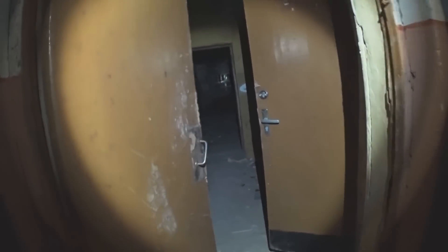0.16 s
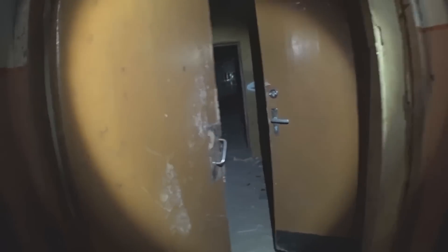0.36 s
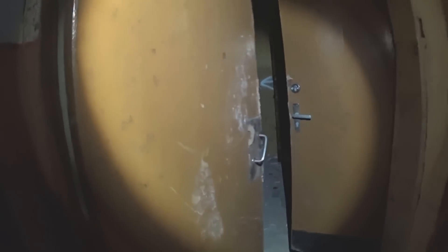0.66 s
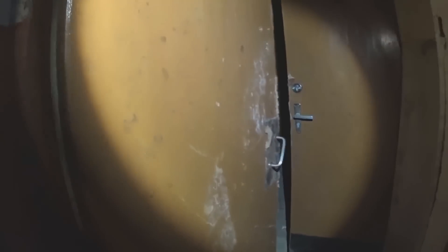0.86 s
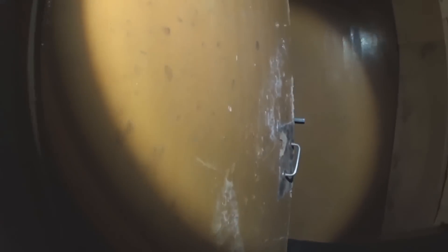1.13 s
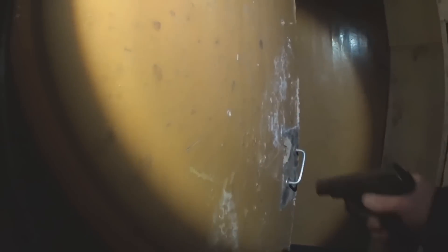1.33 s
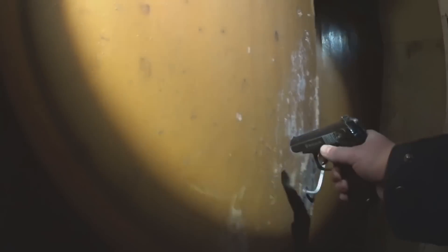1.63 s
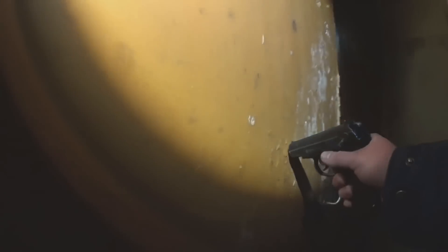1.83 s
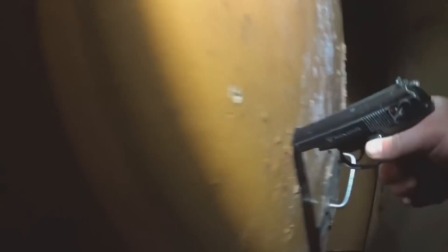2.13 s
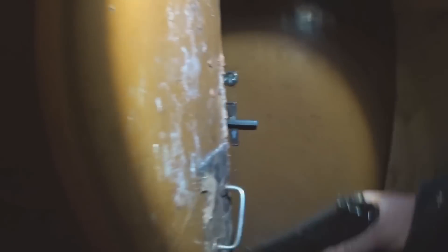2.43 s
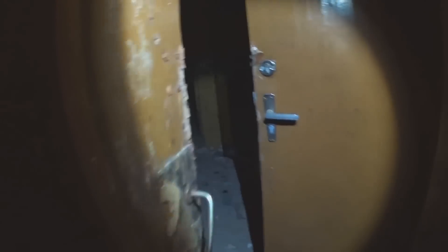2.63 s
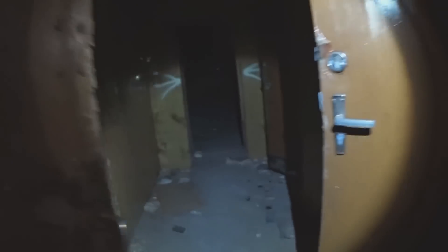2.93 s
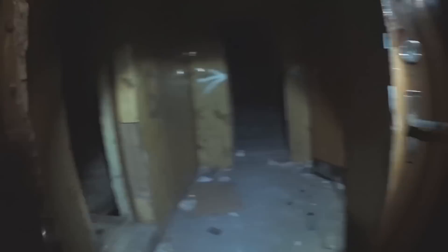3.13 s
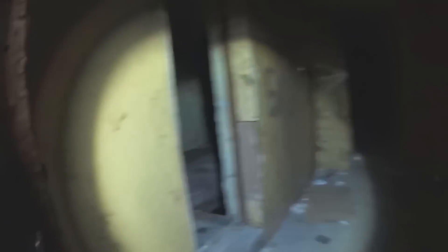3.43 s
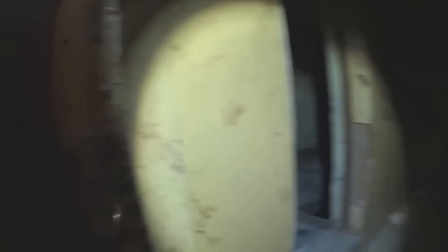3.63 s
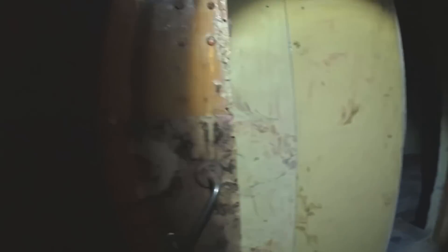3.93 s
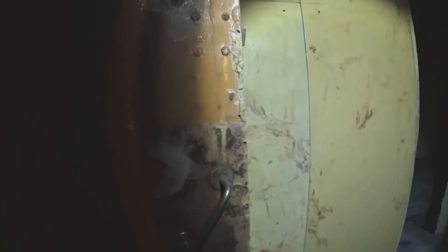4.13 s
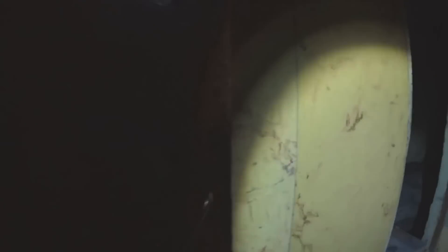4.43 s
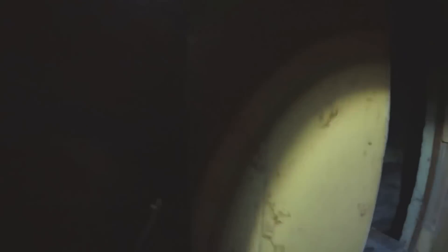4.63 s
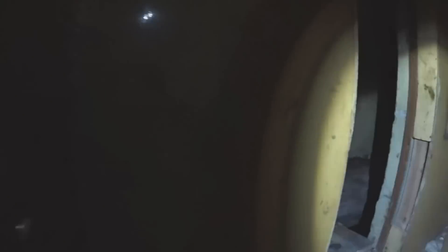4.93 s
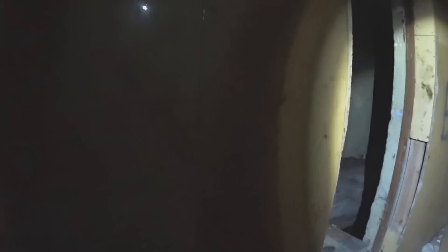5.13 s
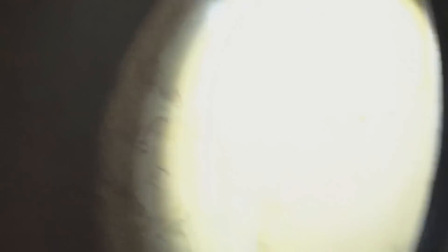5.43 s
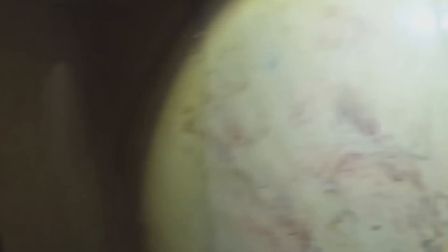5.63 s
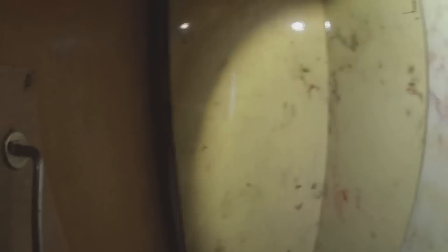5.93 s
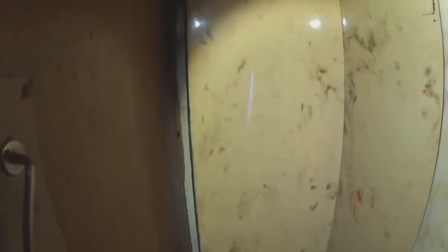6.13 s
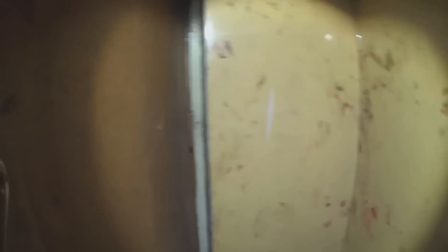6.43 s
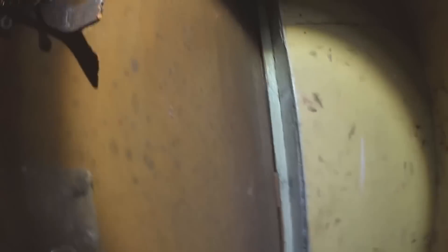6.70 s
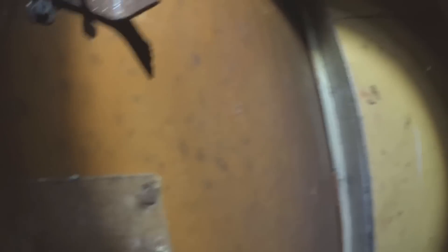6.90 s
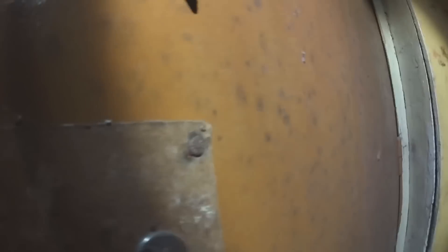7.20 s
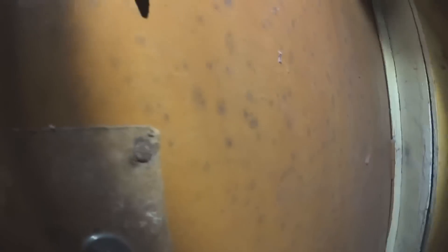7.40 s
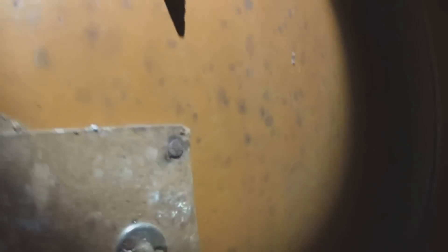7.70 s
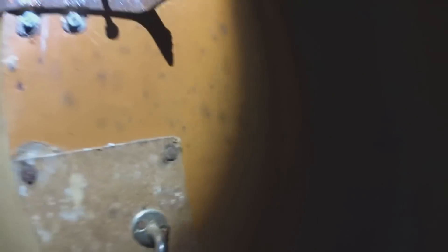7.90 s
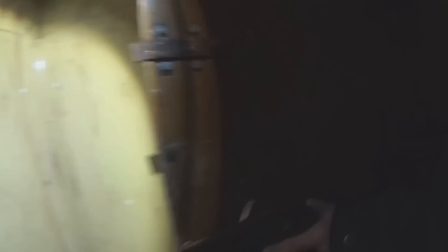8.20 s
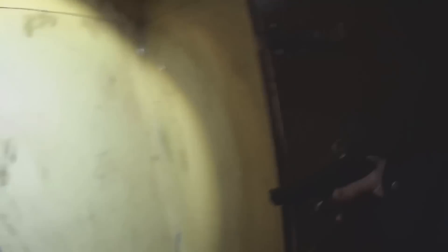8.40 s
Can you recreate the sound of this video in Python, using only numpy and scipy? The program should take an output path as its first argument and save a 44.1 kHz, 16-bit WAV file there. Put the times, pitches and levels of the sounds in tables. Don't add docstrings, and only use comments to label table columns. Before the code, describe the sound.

Close handling of old wooden doors in an empty, reverberant corridor. Faint rustling and grit underfoot lead to a sharp knock and a very loud slam that rings on. Latch clacks, softer bumps and a bright metallic handle rattle follow at uneven intervals. Another hard knock, a rough door-edge squeal and a crashing final bang end it. The small moving microphone is slightly dull, hissy, and clips on the loudest blows.

```python
import sys
import numpy as np
from scipy import signal
from scipy.fft import rfft, irfft
from scipy.io import wavfile
from scipy.ndimage import uniform_filter1d

SR = 44100
rng = np.random.default_rng(int(sys.argv[2]) if len(sys.argv) > 2 else 0)


def amplitude_ratio(level_db):
    exponent = np.asarray(level_db, float) / 20
    return 10 ** exponent


def dump(signal):
    limited = np.clip(np.atleast_2d(signal).T, -1, 1)
    pcm = np.round(limited * 32767).astype(np.int16)
    wavfile.write(sys.argv[1], SR, pcm)


N = 377329

# start_s, knock_db (peak), ring_db (ring of the struck object compared with the knock)
BLOWS = [
    (1.4141, -12, 3),
    (1.9157, 0, 0.5),
    (2.314, -13.5, 3),
    (3.317, -11.5, -1.5),
    (3.601, -18, -2.5),
    (5.411, -15, -6.5),
    (6.579, -7.5, 3.5),
    (7.005, -10, -1),
    (8.096, -2.5, -3),
]
TRAVEL_S = 0.000947
SCUFF_RISE_S = 0.009


def band(x, lo_hz, hi_hz, count=1):
    sections = signal.butter(2, [lo_hz, min(hi_hz, .45 * SR)], "bandpass", fs=SR, output="sos")
    return signal.sosfilt(np.tile(sections, (count, 1)), x)


def thin_bass(x):
    return signal.sosfilt(signal.butter(2, 177, "highpass", fs=SR, output="sos"), x)


def unit(x):
    return x / np.sqrt(np.mean(x ** 2))


def fade(t, t60):
    return np.exp(-np.log(1000) * t / max(t60, .004))


def walk(rate):
    k = int(SR / rate)
    steps = np.repeat(rng.standard_normal(N // k + 1), k)
    return unit(uniform_filter1d(uniform_filter1d(steps, k), k)[:N])


def pair(likeness, size):
    mid, side = rng.standard_normal((2, size))
    c = np.clip(likeness, 0, 1)
    return np.sqrt((1 + c) / 2) * mid + np.sqrt((1 - c) / 2) * side * np.array([[1], [-1]])


def add(out, s, x):
    i = int(s * SR)
    out[i:i + len(x)] += x[:N - i]


def air():
    # pitch_hz, level_db (per Hz)
    hush = [(15, -45), (25, 1.5), (54, -17), (104, -10), (353, -5.5), (480, -11.5), (930, -14.5),
            (1200, -13), (2050, -23), (3410, -21), (11000, -27), (14300, -87), (22000, -120)]
    hz, db = np.transpose(hush)
    f = np.arange(1, N // 2 + 2) * SR / N
    colour = amplitude_ratio(np.interp(np.log(f), np.log(hz), db))
    return amplitude_ratio(-54) * unit(irfft(rfft(pair(0.09, N)) * colour, N))


def effort():
    # time_s, weight_db (on the floor), rubbing_db
    slow_curve = [(0, -57, -51.5), (.45, -55.5, -55.5), (.8, -51.5, -50), (1.26, -53.5, -52),
                  (1.5, -41, -48.5), (1.79, -51.5, -58), (2.6, -48, -46.5), (2.8, -56.5, -50),
                  (3.2, -42, -49.5), (3.501, -50, -55.5), (3.701, -48.5, -48), (4.1, -58.5, -59),
                  (4.74, -51.5, -54.5), (5.3, -56.5, -60), (5.77, -47, -51), (6.39, -58, -56),
                  (7.2, -52, -54), (8.56, -51.5, -50)]
    # start_s, length_s, weight_db, rubbing_db
    stirs = [(0.563, 0.2, -55, -55), (1.83, 0.41, -44, -42.5), (2.0, 0.49, -45, -52),
             (5.382, 0.15, -54, -44), (2.932, 0.26, -53, -47), (5.551, 0.18, -62, -42.5),
             (5.697, 0.12, -72, -46), (6.66, 0.27, -52, -57), (7.33, 0.94, -52, -49),
             (8.117, 0.39, -54, -52), (8.467, 0.34, -41, -58)]
    s, *columns = np.transpose(slow_curve)
    gains = [amplitude_ratio(np.interp(np.arange(N) / SR, s, db)) for db in columns]
    for start, length, *levels in stirs:
        for gain, db in zip(gains, levels):
            add(gain, start, amplitude_ratio(db) * np.hanning(int(length * SR)))
    return 20 * np.log10(gains)


def moves():
    weight, rubbing = effort()
    rumble_db = weight - 11.5
    cloth_db = rubbing - 9
    layers = [(29.3, 85, 0.66, 1.0, rumble_db), (130, 740, 0.56, 0.23, weight),
              (509, 2530, 1.2, 0.088, rubbing), (2660, 7000, 2.57, 1.0, cloth_db)]
    out = 0
    for lo_hz, hi_hz, grain_db, likeness, db in layers:
        grains = pair(likeness, N) * amplitude_ratio(grain_db * rng.exponential(size=N))
        out = out + unit(band(grains, lo_hz, hi_hz)) * amplitude_ratio(db + 2.0 * walk(30))
    return out


def sleeve():
    # start_s, end_s, level_db, broad_db (wide swish compared with the weave)
    swishes = [
        (3.18, 3.555, -72, -9),
        (3.593, 3.654, -66.5, 21.5),
        (5.335, 5.405, -60, -3),
        (6.49, 6.543, -60.5, 1.5),
        (6.653, 6.95, -61.5, 0.5),
        (6.914, 6.948, -55, -1),
        (6.972, 7.01, -62, -6),
        (7.033, 7.168, -57.5, -9),
        (7.984, 8.05, -53.5, 2.5),
    ]
    # pitch_hz, width_hz
    weave = [(4500, 630), (5500, 800)]
    hiss = 0
    for hz, width in weave:
        strip = unit(band(rng.standard_normal(N), hz - width / 2, hz + width / 2))
        hiss = hiss + strip * amplitude_ratio(2.2 * walk(40))
    broad = unit(band(rng.standard_normal(N), 4500, 9100)) * amplitude_ratio(2.1 * walk(60))
    out = np.zeros(N)
    for start, end, db, broad_db in swishes:
        a, b = int(start * SR), int(end * SR)
        swell = np.hanning(b - a) ** 0.25
        add(out, start, amplitude_ratio(db) * swell * (hiss + amplitude_ratio(broad_db) * broad)[a:b])
    return out


def squeal():
    # time_s, level_db, pitch_hz
    path = [(7.672, -67, 1000), (7.683, -33, 1004), (7.74, -37.5, 1088), (7.775, -32, 1188),
            (7.805, -34.5, 1237), (7.824, -36.5, 1060), (7.885, -38, 1330), (7.92, -43.5, 1390),
            (7.935, -63, 1380)]
    s, db, hz = np.transpose(path)
    t = np.arange(N) / SR
    bite = walk(80)
    pitch_hz = np.interp(t, s, hz)
    phase = 2 * np.pi * np.cumsum(pitch_hz * (1 + 0.015 * bite)) / SR
    grip = amplitude_ratio(np.interp(t, s, db, left=-120, right=-120) + 1.2 * bite)
    rough = np.clip((pitch_hz - 950) / 300, .6, 1)
    slip = np.sin(phase + 1.35 * rough * walk(450)) * amplitude_ratio(3 * walk(500))
    side_tones = np.sin(1.2 * phase) + np.sin(.78 * phase)
    slip = slip + .3 * rough * walk(700) * side_tones
    scrape = unit(band(rng.standard_normal(N), 500, 2200))
    return grip * (unit(slip) + amplitude_ratio(-9) * scrape)


def pings():
    # start_s, pitch_hz, peak_db, t60_s
    thumps = [(0.418, 1310, -43, 0.099), (0.601, 142, -38, 0.28), (.705, 139, -41, 0.12),
              (1.378, 130, -38, 0.17), (1.919, 44.6, -29, 0.18), (2.978, 164, -22.5, 0.075),
              (2.994, 110, -27.5, 0.15), (3.124, 110, -33, 0.18), (3.325, 144, -26, 0.15),
              (3.86, 44, -44, 0.27), (4.007, 241, -36, 0.13), (4.012, 50, -41, 0.15),
              (4.355, 138, -38, 0.15), (4.589, 292, -44, 0.12), (4.738, 1117, -42, 0.1),
              (4.866, 241, -55, 0.12), (5.081, 100, -46, 0.055), (6.352, 110, -38.5, 0.06),
              (6.58, 62, -42, 0.067), (6.72, 55, -43, 0.22), (6.716, 552, -36, 0.16),
              (6.823, 506, -38, 0.17), (7.395, 212, -34, 0.059), (7.535, 487, -40, 0.31),
              (7.915, 328, -34.5, 0.072), (8.0965, 600, -4.5, 0.035), (8.321, 805, -32.5, 0.13)]
    # start_s, pitch_hz, peak_db, t60_s
    rebounds = [(0.0708, 2100, -30, .015), (0.0742, 1870, -33, .05), (0.075, 4260, -43, .06),
                (0.078, 682, -40, 0.088), (0.4475, 1330, -44, .04), (1.4148, 2000, -3, 0.027),
                (1.4165, 3150, -11, 0.021), (1.443, 520, -28, 0.03), (1.4165, 600, -11.5, 0.024),
                (1.4245, 768, -12, 0.036), (1.9235, 640, 3.5, .04), (1.934, 314, -11, 0.11),
                (1.9485, 582, -4.5, 0.085), (2.2495, 178, -14.5, 0.15), (2.307, 1500, -25, .04),
                (2.307, 2500, -26, 0.026), (2.31, 45, -36, 0.22), (2.327, 3530, -30, .015),
                (3.123, 450, -31, 0.044), (3.339, 260, -29, .06), (3.6018, 1450, -19, 0.035),
                (3.622, 1330, -33, 0.1), (3.6015, 4700, -34, 0.026), (3.607, 7300, -45, 0.12),
                (4.742, 1160, -40, 0.072), (4.772, 1090, -46, 0.037), (5.0845, 252, -32, .015),
                (5.086, 5700, -42, .02), (5.09, 4900, -45, .015), (5.096, 6200, -40, .015),
                (5.412, 62, -38.5, .15), (5.416, 2500, -40, .05), (7.394, 5270, -43, 0.055),
                (7.694, 2200, -28, .03), (7.712, 2250, -28, .025), (2.7, 49.6, -46, 0.31),
                (2.252, 620, -24, .06), (1.9165, 958, -12, 0.072), (1.918, 265, -6.5, .15),
                (7.017, 519, -19, 0.088), (8.137, 530, -26, .05), (8.156, 687, -29, .08)]
    t, out = np.arange(SR // 3) / SR, np.zeros(N)
    for s, hz, db, t60 in thumps + rebounds:
        swell = 1 - np.exp(-t / 0.0013)
        add(out, s, amplitude_ratio(db) * np.sin(2 * np.pi * hz * t) * fade(t, t60) * swell)
    return out


def snaps():
    # start_s, peak_db, pitch_hz
    metal = [(1.4189, -18.5, 1950), (1.4151, -27, 4700), (1.9176, -16, 2100), (2.2495, -29, 900),
             (2.581, -26, 5020), (2.6, -31, 2000), (3.126, -35, 4000), (5.4135, -29, 600),
             (5.4656, -24, 5000), (5.4745, -4, 2600), (5.4788, -16, 1990), (5.4808, -3, 3590),
             (5.4842, -6, 2500), (5.485, -24, 3000), (5.5840, -10, 4460), (5.5855, -5, 3420),
             (5.588, -10, 5000), (5.592, -21, 4940), (5.5979, -25, 1300), (5.606, -20, 3500),
             (5.614, -16, 3000), (5.639, -21, 2000), (5.6403, -17, 1700), (5.644, -21, 1500),
             (5.6505, -25, 1500), (5.7248, -34, 1300), (5.747, -29.5, 1500), (5.752, -34, 2000),
             (5.767, -38, 1500), (6.5815, -10, 1110), (6.62, -34, 5500), (6.73, -34, 6000),
             (6.8225, -35, 800), (7.3945, -24, 1060), (7.399, -29, 5000), (7.882, -22.5, 696),
             (8.0984, -6.5, 1500), (8.0998, -6, 2000), (8.1025, -7.5, 700), (8.1085, -32, 5500)]
    # start_s, peak_db, pitch_hz
    wood = [(0.4183, -35, 2800), (0.4677, -34, 1100), (0.4725, -35, 1800), (1.4151, -7.5, 2400),
            (2.2505, -20, 700), (3.126, -23.5, 1200), (2.3148, -6.5, 1340), (2.3185, -13, 3540),
            (3.3185, -11, 600), (6.5803, -5, 1000), (6.7165, -35, 600), (7.0056, -11, 790),
            (7.6945, -17.5, 700), (7.602, -29, 1210), (8.0972, -4, 1000)]
    t, out, sheen = np.arange(SR // 25) / SR, np.zeros(N), np.zeros(N)
    for s, db, hz in metal + wood:
        swing = np.sin(2 * np.pi * hz * t) * np.exp(-(t * hz / 1.4 * 2) ** 2)
        add(out, s - .25 / hz, -amplitude_ratio(db) * swing)
    for s, db, hz in metal:
        shimmer = unit(band(rng.standard_normal(len(t)), 13300, 15000)) * fade(t, 0.063)
        add(sheen, s, shimmer * amplitude_ratio(db - 30.5) * hz / 3000)
    return thin_bass(out), sheen


def contacts():
    # start_s, knock_db (peak), knock_hz, weight_db, hardness_db
    taps = [(0.075, -32.5, 1790, -13, 3), (0.467, -42, 1330, -28, -7), (2.249, -20.5, 620, 6, -24),
            (2.977, -33, 430, 6, -2.5), (3.578, -33, 1360, -0.5, -2), (4.008, -37, 530, -4, -17),
            (4.35, -32.5, 805, -13, -24), (4.368, -41, 553, -8, 4), (4.519, -41, 800, -6, 5),
            (5.318, -41.5, 409, -5, 0), (5.931, -27.5, 636, -21, -13), (6.619, -25, 748, -11, -8),
            (6.715, -23.5, 495, -21, -11.5), (6.731, -28, 495, 1, -13), (6.822, -26.5, 456, -3.5, -25),
            (7.693, -14.5, 484, -12, -4.5), (7.712, -16.5, 500, -11, -17), (8.114, -11.5, 530, -6.5, -8),
            (8.541, -26.5, 1250, -8, -6)]
    # start_s, knock_db (peak), knock_hz, hardness_db
    rattles = [
        (5.464, -18.5, 643, -1.5),
        (5.4717, -19, 1500, 6.5),
        (5.479, -21.5, 1110, 11.5),
        (5.583, -22, 1070, 7),
        (5.596, -18, 960, -0.5),
        (5.638, -23.5, 1070, 1.5),
    ]
    # start_s, knock_db (peak), knock_hz, weight_db, tick_db
    clicks = [
        (1.79, -44, 463, 14.5, -12),
        (5.084, -41, 398, -7.5, 1.5),
        (6.046, -47, 904, 4.5, -7),
        (6.349, -49.5, 660, 9, 6.5),
        (6.774, -49, 738, -9, 9),
        (7.395, -29.5, 600, -1, -0.5),
        (8.459, -41.5, 590, -20, 12),
    ]
    # start_s, knock_db (peak), knock_hz, weight_db, hardness_db
    scuffs = [(0.416, -45, 1280, -22, -1), (0.601, -41.5, 780, -5, 6), (0.637, -44, 655, -18, 4.5),
              (0.715, -38.5, 1240, -7, -19), (0.826, -47, 640, -1, 7), (1.37, -55, 676, -2, 1),
              (1.799, -43.5, 450, 2, 12.5), (1.839, -43, 500, 2, 9), (2.575, -34, 640, -23, -3),
              (3.117, -31, 590, 4, -1.5), (3.734, -41.5, 463, 4.5, -11), (4.744, -44, 1130, -8, -7),
              (4.772, -45, 1370, 3, -5), (4.859, -52, 894, 14.5, -10), (5.435, -36, 437, -36, -8),
              (5.499, -34, 900, -28, 9.5), (5.609, -39.5, 950, -22, 7), (5.659, -43, 1000, -19, 6),
              (6.92, -50, 806, -13, 1), (7.589, -32.5, 506, -22, -5), (8.312, -30.5, 770, -24, -28)]
    metal_sizzle_db = -4
    light = [(*row, 1.34 * row[-1] - 6.5) for row in taps]
    for s, db, hz, hard in rattles:
        light.append((s, db, hz, -17, hard, 0.89 * hard - 4.5, metal_sizzle_db))
    for s, db, hz, weight, tick in clicks:
        light.append((s, db, hz, weight, tick - 5, tick, metal_sizzle_db))
    return light, [(*row, row[-1] - 6.5) for row in scuffs]


def hit(knock_db, knock_hz, thud_db, clack_db, tick_db, sizzle_db=-9.5, soft=False, count=14):
    # lowest_hz, highest_hz, t60_s, rise_s, noise_share (0-1), crack_db (compared with ring)
    parts = [
        (110, 380, 0.11, 0.0058, 0.42, -23),
        (357, 1600, 0.077, 0.00043, 0.62, 4.5),
        (1500, 3890, 0.08, 0.00046, 0.45, 11),
        (3606, 6930, 0.094, 0.00021, 0.65, 10),
        (6940, 10000, 0.12, 0.00045, 0.33, 16),
    ]
    part_levels_db = (thud_db, 0, clack_db, tick_db, tick_db + sizzle_db)
    t, out = np.arange(SR // 5) / SR, 0
    for (lo, hi, t60, rise, noisy, crack_db), db in zip(parts, part_levels_db):
        pick = rng.random((count, 2))
        hz = lo * (hi / lo) ** ((np.arange(count) + pick[:, 0]) / count)
        size = (.3 + pick[:, 1]) * np.sqrt(lo / hz)
        if lo == parts[1][0]:
            octaves = 0.54
            size = size * np.exp(-.5 * (np.log2(hz / knock_hz) / octaves) ** 2)
            lo, hi = knock_hz * 2 ** -octaves, knock_hz * 2 ** octaves
        modes = unit(size @ np.sin(2 * np.pi * hz[:, None] * t))
        rattle = unit(band(rng.standard_normal(len(t)), lo, hi, count=2))
        if soft:
            ring = (rattle + modes) * fade(t, t60) * (1 - np.exp(-t / SCUFF_RISE_S)) ** 2
        else:
            crack = amplitude_ratio(crack_db) * fade(t, 0.015 * (500 / lo) ** 0.43)
            shape = (fade(t, t60) + crack) * (1 - np.exp(-t / rise))
            ring = ((1 - noisy) * modes + noisy * rattle) * shape
        out = out + amplitude_ratio(knock_db + db - 1) * ring / np.abs(ring).max()
    return out


def struck(modes, peak_db):
    t, ring = np.arange(SR // 3) / SR, 0
    loose = 1 - np.exp(-t / 0.0072)
    for hz, db, t60 in modes:
        rattle = unit(band(rng.standard_normal(len(t)), .87 * hz, 1.15 * hz))
        clean = np.sin(2 * np.pi * hz * t)
        ring = ring + amplitude_ratio(db) * fade(t, min(t60, .25)) * ((1 - loose) * clean + 0.66 * loose * rattle)
    ring = ring * (1 - np.exp(-t / 0.00044)) ** 2
    return amplitude_ratio(peak_db) * ring / np.abs(ring).max()


def knocks():
    # knock_hz, then thud_db, clack_db, tick_db (compared with the knock)
    builds = [(747, -4.5, 6, -13.5), (640, -6.5, -13, -12), (570, 1, -4, -7), (553, -7, -43, -45),
              (1570, -40, -9.5, -10.5), (614, -8, -40, -45), (1220, -36, -13.5, -19.5), (680, -8, -16, -42),
              (600, -18.5, -0.5, -11.5)]
    # pitch_hz, level_db, t60_s
    near_modes = [
        [(495, -12.5, 0.13), (780, -13.5, 0.09), (1110, -25.5, 0.06), (800, -23.5, 0.35), (2500, -26, 0.059),
         (1980, -8.5, 0.055), (4325, -18, 0.08)],
        [(305, -6, 0.29), (615, -3.5, 0.065), (1514, -13, 0.055), (1004, -12, 0.069), (2100, -24, 0.12)],
        [(1380, -3, 0.069), (1887, 0.5, 0.031), (2064, -2, 0.032), (2570, -12, 0.027), (3220, 1.5, 0.0099),
         (3360, -17, 0.034), (3600, -35, 0.073)],
        [(365, 5.5, 0.035), (430, 7, 0.048), (530, 1, 0.06), (865, 4, 0.14), (1330, -1.5, 0.055),
         (1380, -10, 0.062), (1620, -39, 0.17)],
    ]
    # pitch_hz, level_db, t60_s
    far_modes = [
        [(1000, -23, 0.08), (1380, -1, 0.22), (1350, 10, 0.066), (2000, -6, 0.15), (2500, -10, 0.19),
         (3800, -15, 0.26)],
        [(292, 0, 0.069)],
        [(510, -10.5, 1.3), (770, 5, 0.084), (1000, 13, 0.012), (1060, -21, 0.033), (1198, 9, 0.047),
         (1380, -22, 0.16), (1730, -15, 0.21), (2130, -16, 0.091)],
        [(292, -36, 0.36), (500, -8.5, 0.15), (738, -6, 0.04), (844, -41, 0.14), (1330, -6, 0.024),
         (1640, -30, 0.16), (2240, -21, 0.1)],
        [(530, -6, 0.2), (970, 6, 0.082), (1315, -4, 0.13), (1380, 5, 0.08), (1990, 7, 0.068),
         (2740, -28, 0.094), (3220, -27, 0.063), (3220, -32, 0.07), (3920, -28, 0.091), (5200, -3, 0.099)],
    ]
    out, (light, scuffs) = np.zeros(N), contacts()
    for (s, knock_db, ring_db), build, modes in zip(BLOWS, builds, near_modes + far_modes):
        add(out, s + TRAVEL_S, amplitude_ratio(-0.5) * hit(knock_db, *build))
        add(out, s + TRAVEL_S, struck(modes, knock_db + ring_db))
    for s, *row in light:
        add(out, s + TRAVEL_S, hit(*row))
    for s, *row in scuffs:
        add(out, s - SCUFF_RISE_S / 2, hit(*row, soft=True))
    return thin_bass(out)


def leaf():
    # pitch_hz, level_db, t60_s
    panel = [(141.5, 2.5, 0.66), (179, 0.5, 1.23), (213.7, -7.5, 2.36), (265, -1, 1.64), (308, 1.5, 1.42),
             (345, -0.5, 1.53), (463, 0, 1.33), (537, -8.5, 1.56), (582, 5.5, 0.56), (643, -3.5, 1.34),
             (786, -3, 1.1), (843, 0, 0.73), (953, -8.5, 0.89), (1070, 0.5, 0.36)]
    t, out = np.arange(3 * SR // 2) / SR, np.zeros((N, 2))
    boom = 0
    for hz, db, t60 in panel:
        shake = unit(band(pair(0.98, len(t)), 0.93 * hz, 1.122 * hz))
        boom = boom + amplitude_ratio(db) * fade(t, t60) * (np.sin(2 * np.pi * hz * t) + 0.93 * shake)
    boom = amplitude_ratio(-11.5) * boom * (1 - np.exp(-t / 0.003)) / np.sqrt(len(panel))
    slam_s = BLOWS[1][0]
    add(out, slam_s + TRAVEL_S, boom.T)
    return out.T


def corridor(x):
    # pitch_hz, t60_s, level_db, likeness (left-right, 0-1)
    room = [(92, 1.9, -20.5, 1), (204, 0.72, -16.5, 1), (415, 0.5, -19, 0.9), (660, 0.71, -25.5, 0.6),
            (1330, 0.49, -21, 0.7), (2946, 0.39, -23.5, 0.8), (5100, 0.38, -25.5, 0.64),
            (8600, 0.54, -26, 0.7)]
    # from_s, echo_db, boom_db (bass of the echo)
    places = [
        (0, 3, -3.5),
        (2.2, -5, 1),
        (3.9, 3.5, -7.5),
        (6.2, -2.5, -1),
        (7.9, -1, 0.5),
    ]
    t, out = np.arange(3 * SR // 2) / SR, 0
    edges = [int(row[0] * SR) for row in places] + [N]
    for (_, level_db, boom_db), a, b in zip(places, edges, edges[1:]):
        tail = 0
        for hz, t60, db, likeness in room:
            octave = band(pair(likeness, len(t)), hz / np.sqrt(2), hz * np.sqrt(2))
            tail = tail + amplitude_ratio(db + boom_db * (hz < 450)) * octave * fade(t, t60)
        tail = amplitude_ratio(level_db) * tail * (1 - np.exp(-t / 0.0009)) / 10
        wet = signal.fftconvolve(x[None, a:b], tail, axes=1)
        out = out + np.pad(wet, ((0, 0), (a, N)))[:, :N]
    return out


def scene():
    # time_s, balance_db (left minus right)
    turn_path = [(0, 3), (1.1, 1.5), (1.4, 3), (1.8, 2.5), (2.9, 2), (3.3, 2.5), (3.6, 5), (3.9, 2.5),
                 (6.4, 2.5), (7.1, 1.5), (7.8, 1), (8.1, 2), (8.56, 2.5)]
    thumps = pings()
    swings, sheen = snaps()
    near = knocks() + thumps + squeal() + sleeve() + swings
    t = np.arange(N) / SR
    pan_db = np.interp(t, *np.transpose(turn_path)) - 2.1
    housing = signal.lfilter([1, -0.56], 1, rng.standard_normal(512)) * fade(t[:512], 0.011)
    housing = housing * (np.arange(512) > 8)
    side = signal.lfilter(housing / np.linalg.norm(housing), 1, near)
    side = amplitude_ratio(-6) * side * np.array([[1], [-1]])
    direct = (near + sheen + side + leaf() + moves()) * amplitude_ratio(np.array([pan_db, -pan_db]) / 2)
    to_walls = near - (1 - amplitude_ratio(-4.5)) * thumps
    return direct + corridor(to_walls) + air()


def roll_off(x):
    return signal.sosfilt(signal.butter(12, 15200, fs=SR, output="sos"), x)


def record(dry):
    dull = signal.sosfilt(signal.ellip(4, .3, 22, 11000, fs=SR, output="sos"), dry)
    return roll_off(np.clip(dull, -1, 1))


dry = scene()
out = record(dry)
dump(out)
```